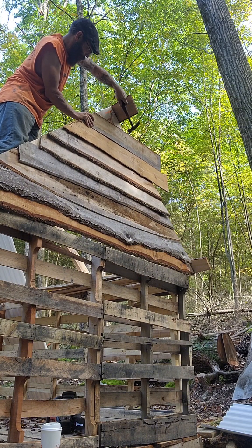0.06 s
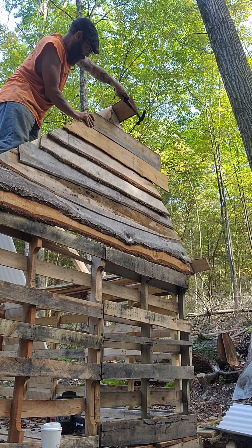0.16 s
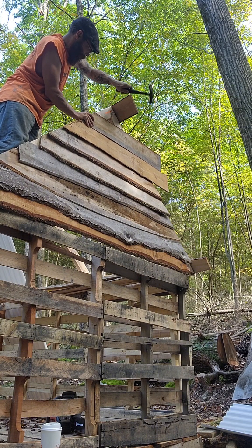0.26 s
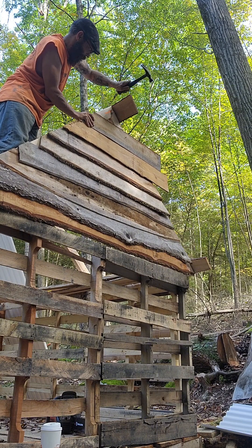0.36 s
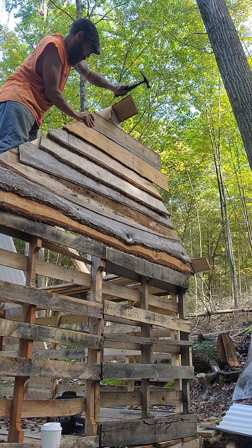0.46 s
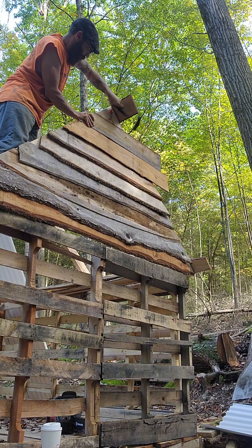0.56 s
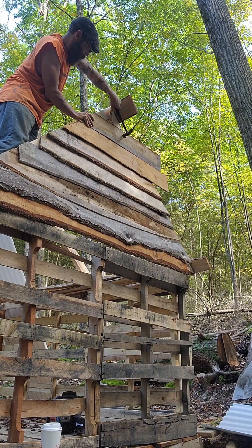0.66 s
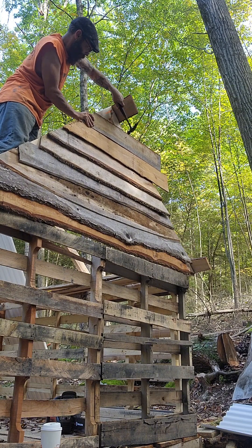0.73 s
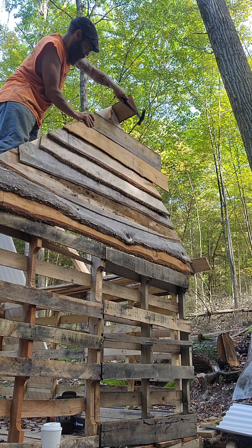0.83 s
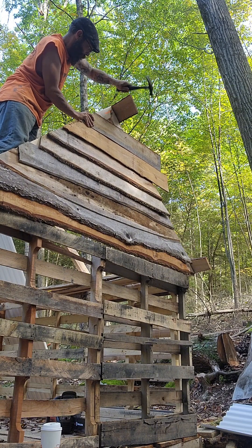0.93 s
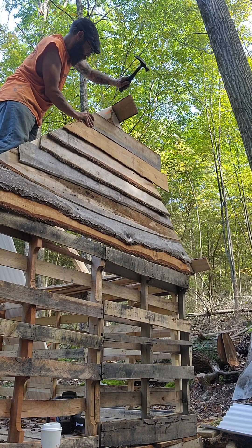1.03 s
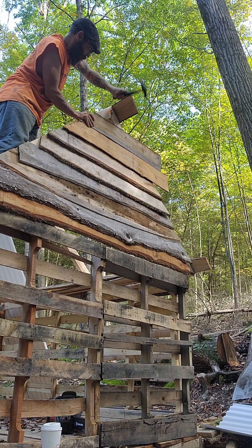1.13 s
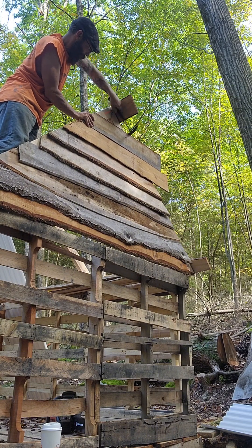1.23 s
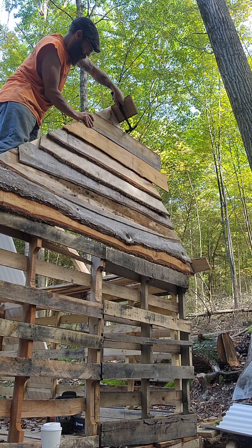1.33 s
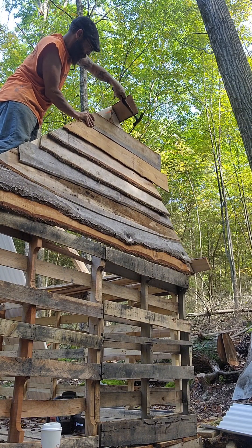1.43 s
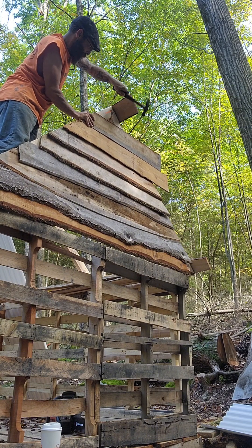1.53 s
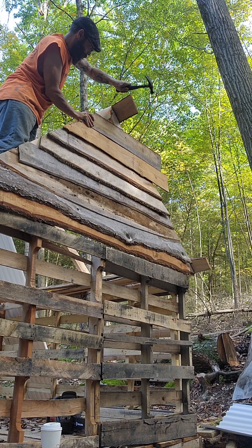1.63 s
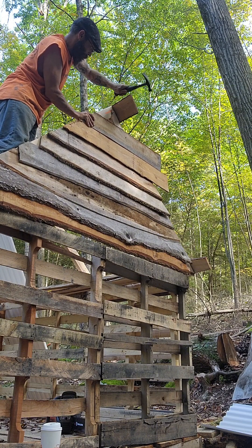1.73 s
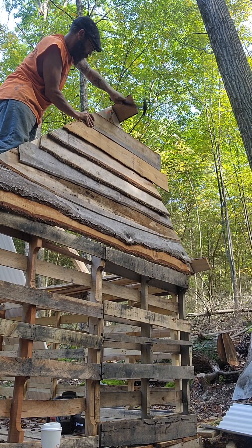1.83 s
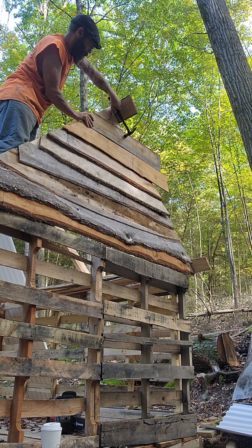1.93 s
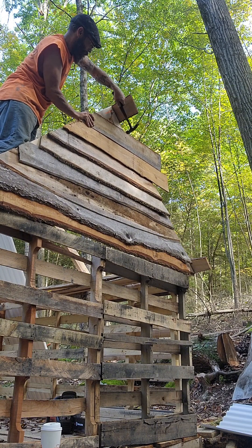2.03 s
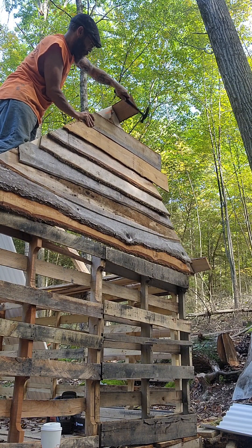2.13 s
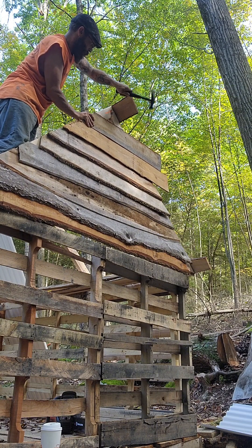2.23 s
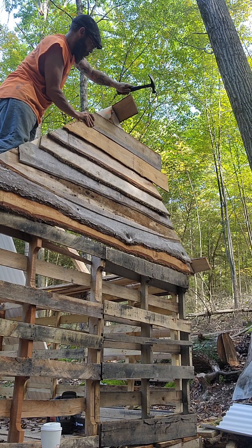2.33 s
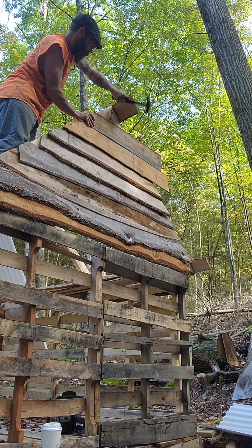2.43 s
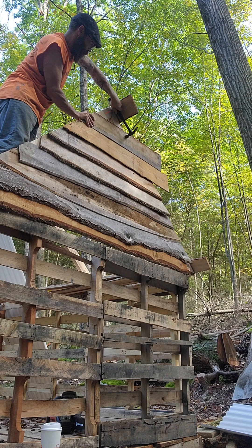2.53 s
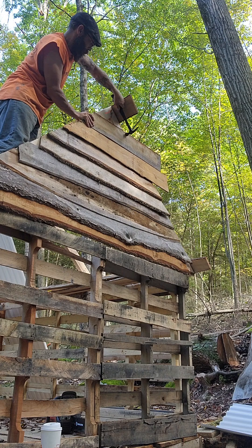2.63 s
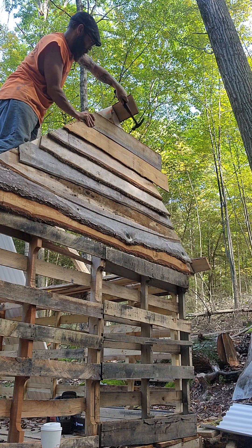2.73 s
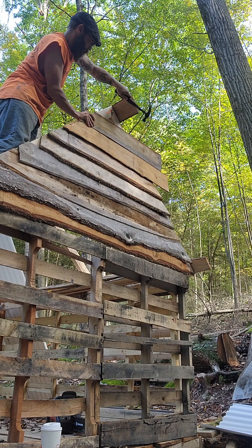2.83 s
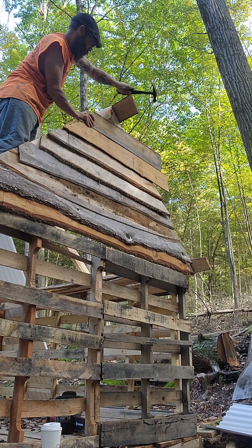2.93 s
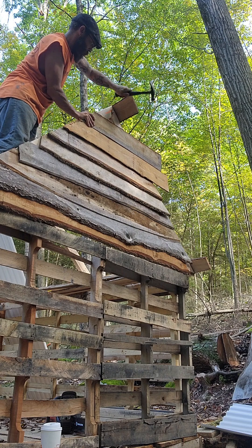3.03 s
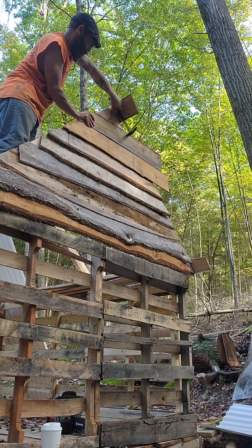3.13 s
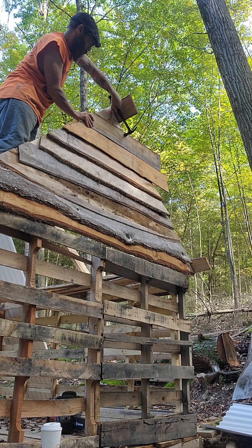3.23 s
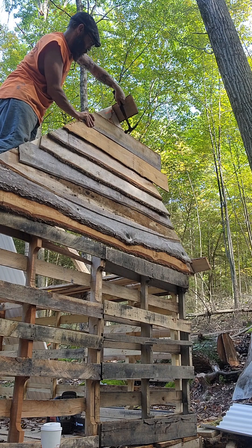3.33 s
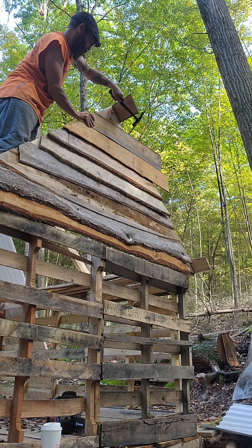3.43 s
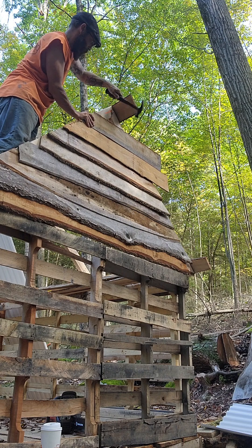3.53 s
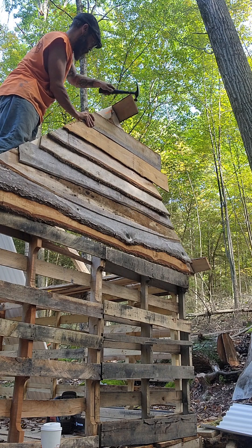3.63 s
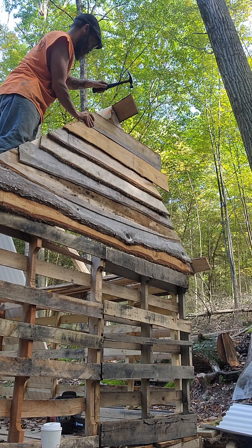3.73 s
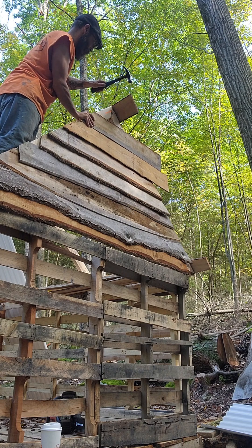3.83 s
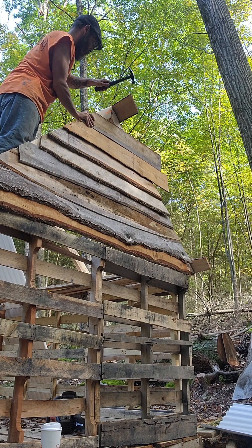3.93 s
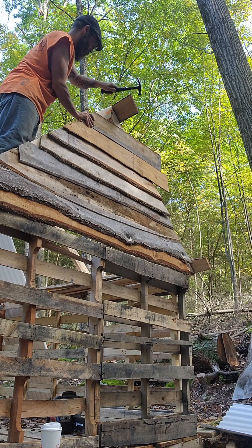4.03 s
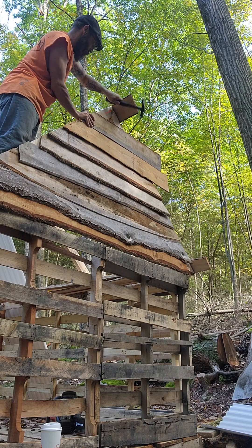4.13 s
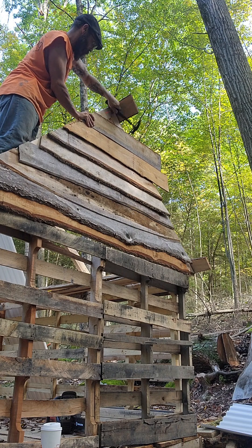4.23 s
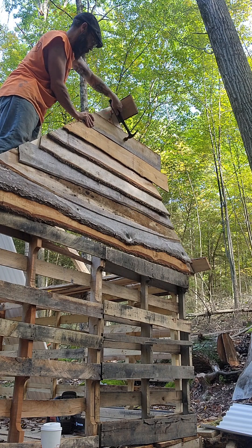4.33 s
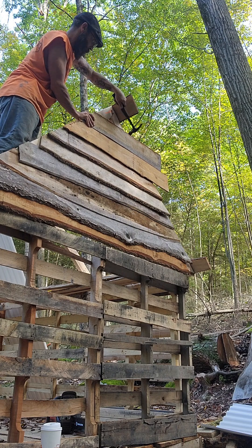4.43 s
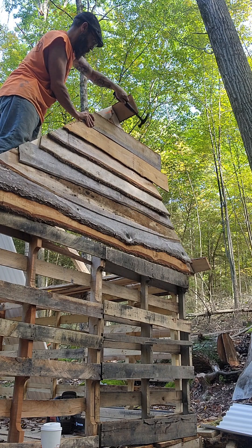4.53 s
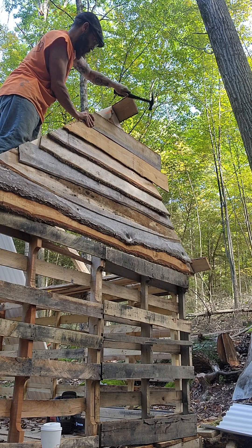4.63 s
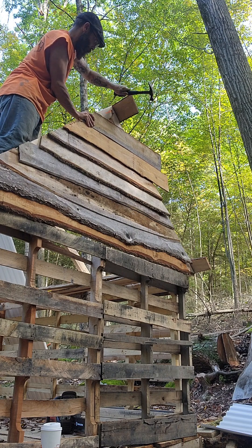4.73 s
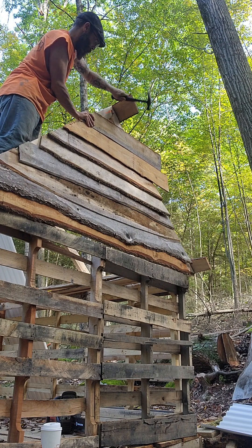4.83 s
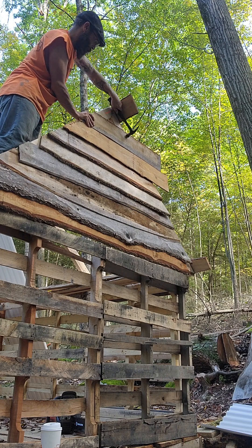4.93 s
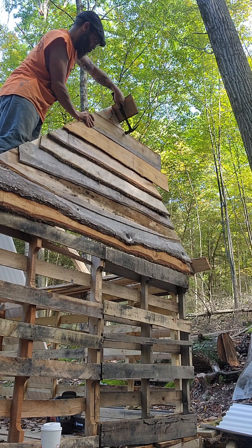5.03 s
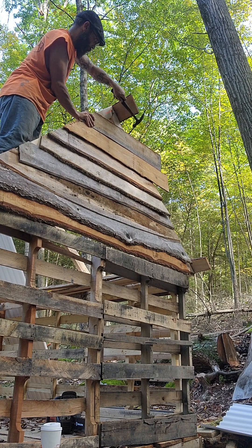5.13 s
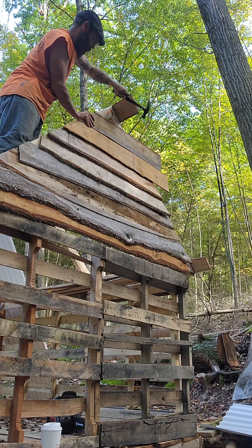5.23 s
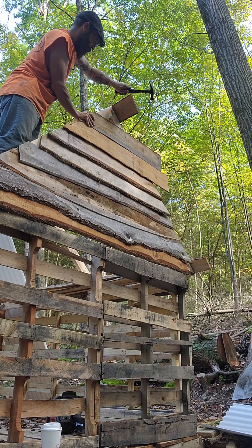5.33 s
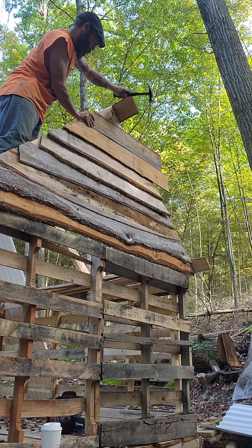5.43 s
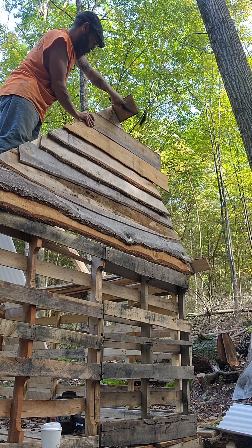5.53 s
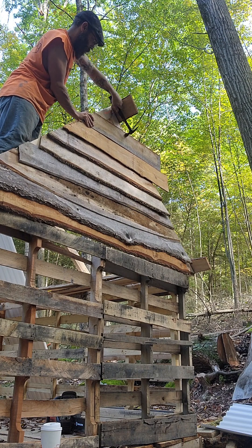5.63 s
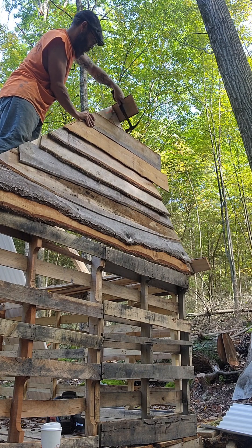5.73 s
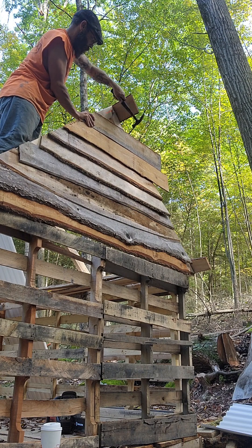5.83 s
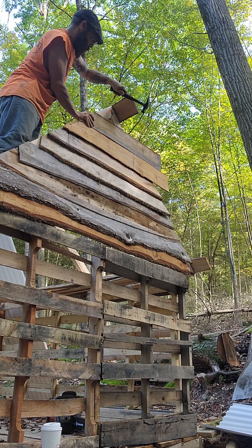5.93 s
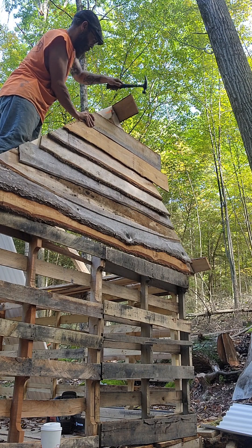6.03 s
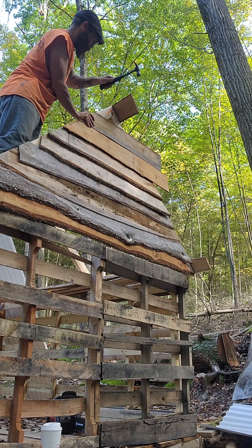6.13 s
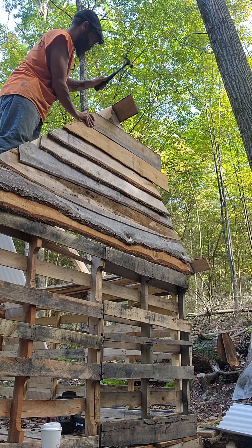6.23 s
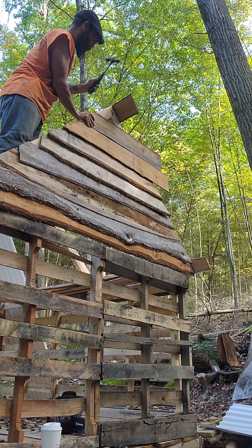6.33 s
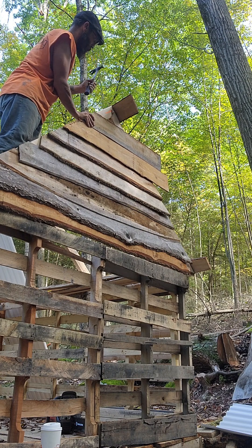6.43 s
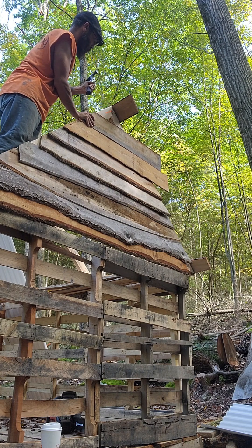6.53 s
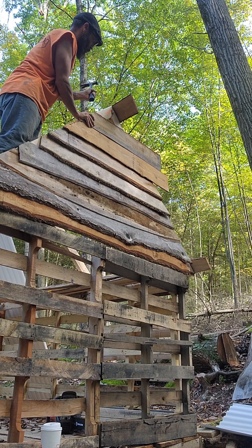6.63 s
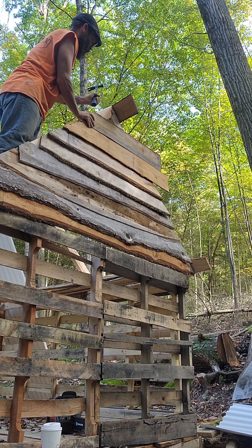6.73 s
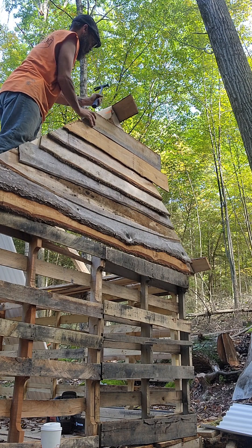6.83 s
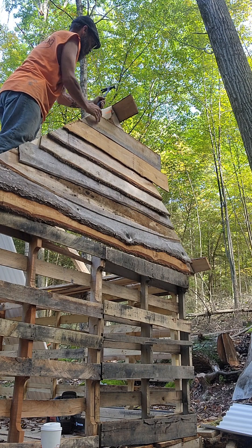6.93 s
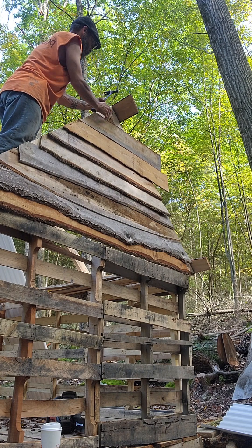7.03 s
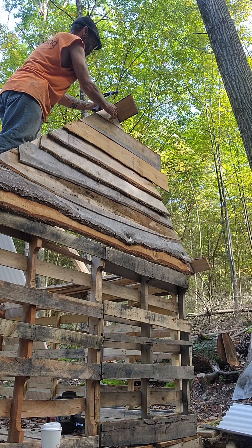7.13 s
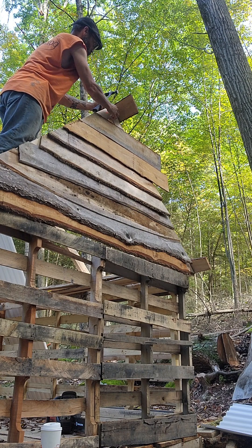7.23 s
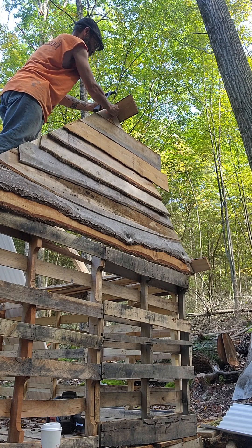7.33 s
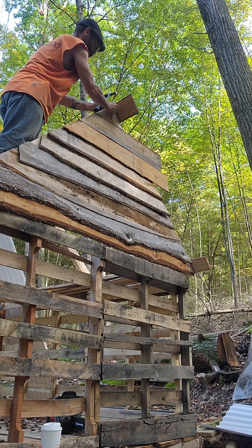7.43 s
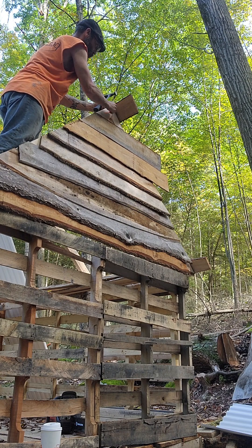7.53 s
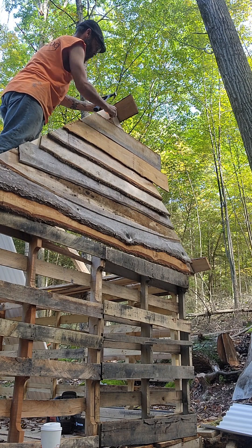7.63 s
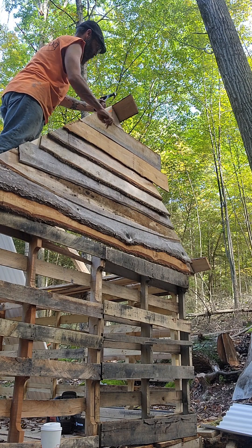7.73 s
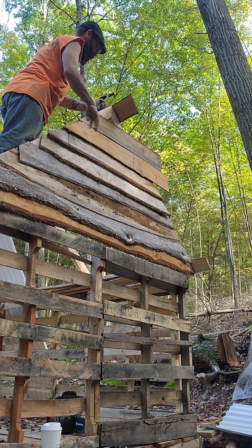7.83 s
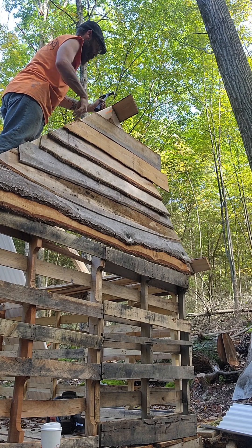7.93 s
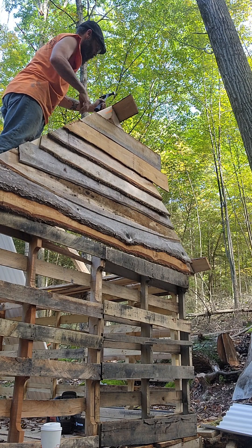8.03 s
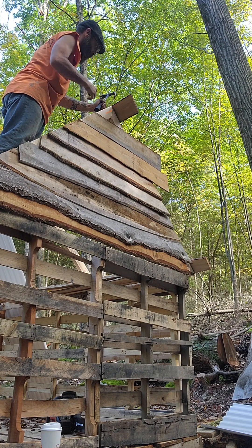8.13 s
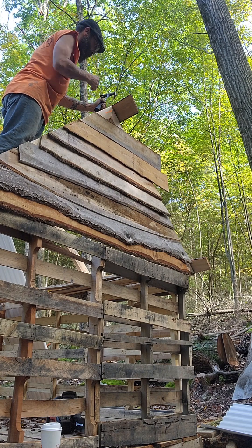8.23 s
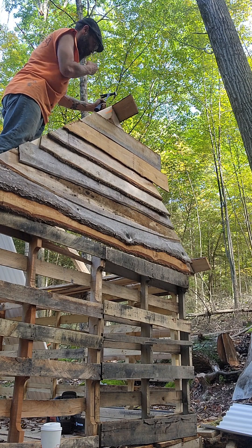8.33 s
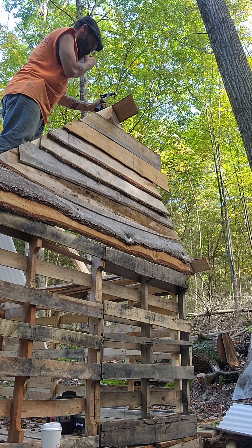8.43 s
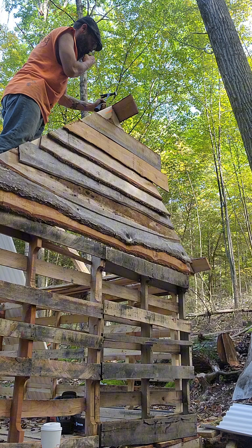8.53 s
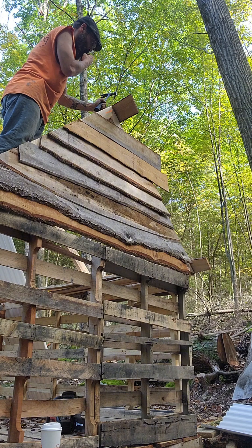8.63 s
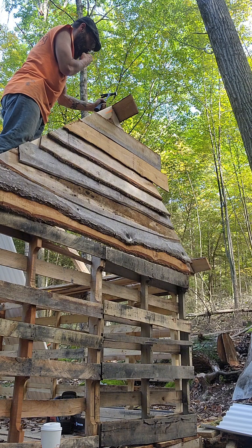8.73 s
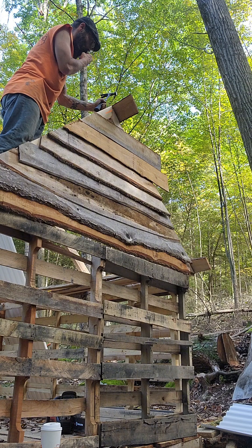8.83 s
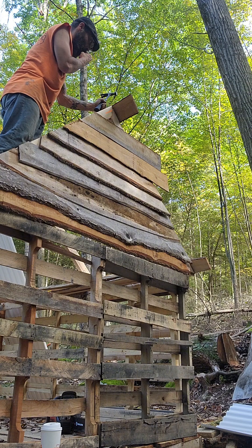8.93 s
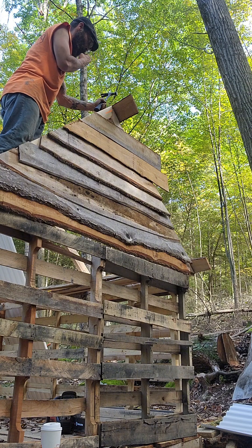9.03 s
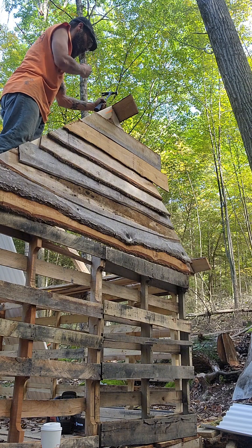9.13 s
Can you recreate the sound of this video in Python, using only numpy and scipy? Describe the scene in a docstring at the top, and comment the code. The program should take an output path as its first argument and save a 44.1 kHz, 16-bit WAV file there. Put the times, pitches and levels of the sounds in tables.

```python
"""A forest, a few metres from a pallet-wood cabin: a steel hammer drives nails into its top board.
Each blow sums damped contact, steel and board modes, a noise crack, decaying plank noise and one bass swing.
The trees answer with long, bright, clumpy noise echoes; air in the leaves and a faint far drone are shaped noise.
Afterwards nails clink softly as the next one is picked out and set on the board: noise clicks, taps and slides."""
import sys
import numpy as np
from scipy import signal
from scipy.fft import rfft, irfft, next_fast_len
from scipy.io import wavfile
from scipy.ndimage import uniform_filter1d, minimum_filter1d, map_coordinates

SR = 44100
rng = np.random.default_rng(int(sys.argv[2]) if len(sys.argv) > 2 else 0)


def generate_wav(signal):
    """Clip the signal to [-1, 1] and save it as 16-bit WAV at the path in sys.argv[1]."""
    frames = np.transpose(np.atleast_2d(signal))
    scaled = np.clip(frames, -1, 1) * 32767
    pcm = np.round(scaled).astype(np.int16)
    wavfile.write(sys.argv[1], SR, pcm)


N = 404382


def amp(db):
    """Decibels to gain."""
    return 10 ** (np.asarray(db) / 20)


def unit(x):
    """Scale to rms 1."""
    return x / np.sqrt(np.mean(x ** 2) + 1e-20)


def along(points, hz):
    """(Hz, value) points interpolated on a log frequency axis."""
    point_hz, values = np.transpose(points)
    return np.interp(np.log(hz + 1), np.log(point_hz + 1), values)


def curve(rows):
    """(s, value) rows as one value per sample."""
    return np.interp(np.arange(N) / SR, *np.transpose(rows))


def add(track, start_s, x):
    """Mix x into the track at start_s."""
    start = max(round(start_s * SR), 0)
    track[:, start:start + x.shape[-1]] += x[..., :N - start]


def filtered(x, response):
    """x through a complex frequency response, zero-padded."""
    n = x.shape[-1]
    padded = 2 * next_fast_len(n // 2 + 4096)  # even, as causal() requires
    spectrum = rfft(x, padded) * response(np.fft.rfftfreq(padded, 1 / SR))
    return irfft(spectrum, padded)[..., :n]


def causal(db):
    """Minimum-phase response with these gains: nothing sounds before the hit."""
    cepstrum = irfft(np.log(amp(db)))
    half = len(cepstrum) // 2
    fold = np.r_[1, np.full(half - 1, 2), 1, np.zeros(half - 1)]
    return np.exp(rfft(cepstrum * fold))


def noise(n, spectrum, alike):
    """Coloured stereo noise of rms 1; the mid/side mix sets the coherence at each frequency."""
    def mid_side_gains(hz):
        angle = np.arccos(np.clip(along(alike, hz), -1, 1)) / 2
        return amp(along(spectrum, hz)) * [np.cos(angle), np.sin(angle)]

    mid, side = filtered(rng.standard_normal((2, n)), mid_side_gains)
    return unit(np.array([mid + side, mid - side]))


def dying(x, t60s):
    """Each frequency of x decays at its own speed."""
    hz, t, z = signal.stft(x, SR, nperseg=256)
    decay = amp(-60 * t / along(t60s, hz)[:, None])
    return signal.istft(z * decay, SR, nperseg=256)[1][:, :x.shape[-1]]


def patchy(x, patch_db, streak_db):
    """Uneven gain: patches in time and frequency, and streaks of colour that last."""
    z = signal.stft(x, nperseg=1024)[2]
    patches = uniform_filter1d(rng.standard_normal(z.shape[1:]), size=7, axis=0)
    patches = uniform_filter1d(patches, size=5, axis=1)
    streaks = uniform_filter1d(rng.standard_normal((z.shape[1], 1)), size=3, axis=0)
    gain = amp(patch_db * unit(patches) + streak_db * unit(streaks))
    return signal.istft(z * gain, nperseg=1024)[1][:, :x.shape[-1]]


def near_surface(x, reflect=0.26, spacing_hz=665, rough_hz=3000):
    """A rough surface beside the microphone ripples the colour of far sounds; it scatters the treble."""
    def response(hz):
        back = reflect * np.exp(-(hz / rough_hz) ** 4)
        return 1 / (1 - back * np.exp(-2j * np.pi * hz / spacing_hz))

    return filtered(x, response)


# Air in the leaves, spectrum. Each row: frequency in Hz, relative density in dB per Hz.
AIR_SPECTRUM = [(20, -12.5), (53, -0.5), (110, -16), (160, -9), (220, -16.5), (400, -18), (750, -19),
                (1400, -21), (2300, -28), (5000, -30), (6900, -44.5), (8100, -59), (14000, -57.5),
                (16000, -60.5)]
# Air in the leaves, envelope. Each row: time in seconds, level in dB before balance and surface.
AIR_LEVEL = [(0, -58.5), (3, -61), (7.1, -64.5), (9.17, -60)]
# Far drone, spectrum. Each row: frequency in Hz, relative density in dB per Hz.
DRONE_SPECTRUM = [(90, -43.5), (145, 1.5), (170, 8.5), (200, -6.5), (300, -31), (900, -88)]
# Far drone, envelope. Each row: time in seconds, level in dB before balance and surface.
DRONE_LEVEL = [(0, -64), (1.1, -62), (1.95, -53), (2.35, -65), (3.8, -70), (4.2, -62), (4.9, -66),
               (6.3, -74.5), (8.7, -80.5), (9.15, -69.5)]
# Left-right likeness of far sounds. Each row: frequency in Hz, coherence 0-1.
FAR_COHERENCE = [(100, 1), (500, 0.48), (1200, 0.14), (3000, 0.05)]


def background():
    """Light air in the leaves and a low drone that comes and goes: noise under slow envelopes."""
    air = amp(curve(AIR_LEVEL)) * noise(N, AIR_SPECTRUM, FAR_COHERENCE)
    drone = amp(curve(DRONE_LEVEL)) * noise(N, DRONE_SPECTRUM, FAR_COHERENCE)
    balance_db = [[.65], [-.65]]
    return (air + drone) * amp(balance_db)


def ring(modes, t, scatter_db, rise_cycles, phase=0):
    """Damped modes that build up over about rise_cycles of their own, at new random strengths each time."""
    hz, db, t60_s = np.transpose(modes)[:, :, None]
    level_db = db + scatter_db * rng.standard_normal(db.shape)
    rise = 1 - np.exp(-t * hz / rise_cycles)
    decay = 1000. ** (-t / t60_s)
    return np.sum(amp(level_db) * rise * decay * np.sin(2 * np.pi * hz * t + phase), axis=-2)


def shove(t, push_db=1.5, push_hz=222, delay_s=.0023, life_s=.0042, leak_hz=190):
    """The nail bites and the board gives way: one heavily damped swing."""
    u = np.maximum(t - delay_s, 0)
    swing = amp(push_db) * np.sin(2 * np.pi * push_hz * u) * np.exp(-u / life_s)
    # the deepest bass slips round the edges of the open board
    return filtered(swing, lambda hz: (1j * hz / (leak_hz + 1j * hz)) ** 2)


def off_ground(x, bounce_db=-15, bounce_delay_s=.0205):
    """The sound plus one reflection from the forest floor."""
    return filtered(x, lambda hz: 1 + amp(bounce_db) * np.exp(-2j * np.pi * hz * bounce_delay_s))


def blow_tone(weight_db, hardness_db, muffling):
    """Weight sets the thud, hardness trades knock for crack and fizz; muffling knocks more, fizzes less."""
    # fixed terms: a clean blow on the nail
    knock_db = -0.5 - 0.45 * hardness_db + 3 * muffling
    fizz_db = 4 + 0.4 * hardness_db - 14.5 * muffling
    return [(214, weight_db), (600, knock_db), (3900, hardness_db), (9500, fizz_db)]  # (Hz, dB)


def coloured(x, weight_db, hardness_db, muffling, lift_hz, lift_db, width=.11):
    """How squarely and where the head lands sets the tone and favours one board resonance."""
    tone = blow_tone(weight_db, hardness_db, muffling)

    def response(hz):
        lift = lift_db / (1 + ((hz / lift_hz - 1) / width) ** 2)
        return causal(along(tone, hz) + lift)

    return filtered(x, response)


# Port shading. Each row: frequency in Hz, left over right in dB.
LEFT_OVER_RIGHT = [(100, 0.1), (700, 0.76), (1400, -3), (2500, 4), (3100, 7.5), (4200, -6), (6500, 6),
                   (8200, 9.5), (15000, 3.5)]


def from_left(x, lead_ms=0.15):
    """Work off to one side: the left port hears it first, the housing shades each port differently."""
    side = np.array([[.5], [-.5]])

    def response(hz):
        shift = np.exp(2j * np.pi * hz * side * lead_ms / 1000)
        return amp(side * along(LEFT_OVER_RIGHT, hz)) * shift

    return filtered(x, response)


# Hammer blows. Each row: start in seconds, weight in dB, hardness in dB, muffling 0-1 (how far the head
# lands on the wood and stays there), favoured resonance in Hz, its lift in dB, steel ring in dB, echo in dB;
# dB values are offsets.
HAMMER_BLOWS = [(0.0731, 0, 3, .05, 232, 0, -12.5, -2), (0.7413, -0.5, -1.5, 0.09, 850, 2, 2, -2),
                (1.3900, 0, 1.5, 0.12, 720, 1, -1.5, 0.5), (2.0323, -0.5, 1.5, 0, 1300, 2.5, -6.5, -0.5),
                (2.6767, -1.5, 2, 0.09, 1435, 0, -9.5, 0), (3.3139, -4, -1.5, 0.12, 1895, 8, -15.5, 5),
                (4.4155, -0.5, -3.5, 0.97, 358, 3, -24.5, -5),
                (5.0756, -4.5, 4, 0.5, 522.7, 11.5, -16, 0.5), (5.7175, -5, 1.6, 0.23, 519, 1, -6.5, 0.5)]
# Head, nail and wood in contact. Each row: frequency in Hz, relative level in dB, t60 in seconds.
CONTACT_MODES = [(1420, -10.5, .022), (1870, -17.5, 0.026), (2720, -8.5, 0.0073), (2900, -14, .012),
                 (3870, -11.5, 0.014), (4080, -7, 0.01), (5162, -20, 0.01)]
# Crack of steel on steel and splitting fibres. Each row: frequency in Hz, relative density in dB per Hz.
SNAP_SPECTRUM = [(500, -4), (4500, 2), (6800, -12.5), (8000, -24.5), (11000, -18), (13500, -19),
                 (16000, -31)]
# Free ring of the steel. Each row: frequency in Hz, relative level in dB, t60 in seconds.
STEEL_MODES = [(4040, -8, .12), (5088, 0, .17), (6885, -10, .1)]
# Board on its frame. Each row: frequency in Hz, relative level in dB, t60 in seconds before blow damping.
BOARD_MODES = [(87, -37, .6), (158, -27, .2), (211, -21.5, .23), (246, -25, .22), (288, -28, .22),
               (358, -27, .2), (425, -30, .2), (512, -26, .19), (592, -26, .2), (688, -26, .16),
               (755, -31, .16), (850, -30, .16), (1050, -32, .18), (1210, -31, .17), (1332, -29, .15),
               (1460, -30, .13)]
# Many close modes of the stacked planks. Each row: frequency in Hz, relative density in dB per Hz.
PLANK_SPECTRUM = [(30, -42), (70, -23), (110, -22), (160, -5.5), (230, 1), (680, -0.5), (1000, -3.5),
                  (1450, -4), (2400, -12), (5000, -15.5), (6500, -24), (7900, -38), (13500, -34.5),
                  (16000, -41)]
# Plank decay. Each row: frequency in Hz, t60 in seconds before blow damping.
PLANK_DECAY = [(80, 0.72), (200, 0.29), (600, 0.21), (1400, 0.19), (4500, .17), (11000, 0.15)]
# Left-right likeness of near sounds. Each row: frequency in Hz, coherence 0-1.
NEAR_COHERENCE = [(150, 0.93), (700, 0.92), (2000, 0.52), (5000, 0.16), (12000, 0.08)]


def hammering(planks_db=-15.0, steel_db=-26, snap_db=-15, snap_life_s=0.0021, spread_s=0.0038,
              fresh=.6, port_turn_rad=0.28):
    """Every blow wakes the same board and planks; the loose ones rattle a little differently each time."""
    track, t = np.zeros((2, N)), np.arange(SR // 2) / SR
    spread = 1 - np.exp(-t / spread_s)  # bending waves need time to fill the frame
    board_phase = rng.uniform(0, 2 * np.pi, (len(BOARD_MODES), 1))
    frame = noise(len(t), PLANK_SPECTRUM, NEAR_COHERENCE)
    for start_s, weight_db, hardness_db, muffling, lift_hz, lift_db, ring_db, _ in HAMMER_BLOWS:
        # fresh: power share of the rattle that is new in this blow
        new_rattle = noise(len(t), PLANK_SPECTRUM, NEAR_COHERENCE)
        rattle = np.sqrt(1 - fresh) * frame + np.sqrt(fresh) * new_rattle
        rattle = dying(patchy(rattle, patch_db=2.0, streak_db=1.5), PLANK_DECAY)
        planks = amp(planks_db) * spread * rattle
        board = ring(BOARD_MODES, t, scatter_db=3.0, rise_cycles=1.0, phase=board_phase)
        # a board pressed by the head stops sooner
        damping_db_per_s = -6 + 110 * muffling
        wood = amp(-damping_db_per_s * t) * (board + planks)

        snap = amp(snap_db) * np.exp(-t / snap_life_s) * noise(len(t), SNAP_SPECTRUM, NEAR_COHERENCE)
        # near reflections turn each mode a little differently at the two ports
        turn = port_turn_rad * rng.standard_normal((2, len(CONTACT_MODES), 1))
        contact = ring(CONTACT_MODES, t, scatter_db=2.5, rise_cycles=0.93, phase=turn)
        steel = amp(steel_db + ring_db) * ring(STEEL_MODES, t, scatter_db=0.5, rise_cycles=1.0)

        blow = off_ground(contact + snap + shove(t)) + wood
        blow = coloured(blow, weight_db, hardness_db, muffling, lift_hz, lift_db)
        add(track, start_s, blow + steel)
    return from_left(track)


# Echo from the trunks. Each row: frequency in Hz, relative density in dB per Hz.
FOREST_SPECTRUM = [(50, -2), (170, 1), (330, 4.5), (620, -2), (1350, -1.5), (2050, -2.5), (2500, -5.5),
                   (5000, -1.5), (6000, -11.5), (7000, -15), (7900, -31), (15000, -28)]
# Echo decay. Each row: frequency in Hz, t60 in seconds.
FOREST_DECAY = [(150, 2), (600, 1.655), (1800, 1.595), (4500, 1), (7000, 0.77), (11000, 0.42)]


def forest_echo(echo_db=-42.0, build_s=0.15, clump_db=0.9, clumps_per_s=45):
    """Trunks near and far scatter each blow back in its colour; the echo swells, then fades in clumps."""
    track, t = np.zeros((2, N)), np.arange(SR * 3 // 2) / SR
    swell = 1 - np.exp(-(t / build_s) ** 2)
    for start_s, *tone, _, blow_echo_db in HAMMER_BLOWS:
        clumps = map_coordinates(rng.standard_normal(256), [t * clumps_per_s], mode="wrap")
        tail = patchy(noise(len(t), FOREST_SPECTRUM, FAR_COHERENCE), patch_db=1.5, streak_db=2.5)
        tail = coloured(dying(tail, FOREST_DECAY), *tone)
        add(track, start_s, amp(echo_db + blow_echo_db + clump_db * clumps) * swell * tail)
    return track


def fumble(start_s, length_s, attack_s=.015, release_s=.04, sag_db_per_s=18):
    """Envelope of one slide of the fingers: a quick rise, a slow sag, a release."""
    t = np.maximum(np.arange(N) / SR - start_s, 0)
    release = np.exp(-np.maximum(t - length_s, 0) / release_s)
    return (1 - np.exp(-t / attack_s)) * amp(-sag_db_per_s * t) * release


# Clearest clinks. Each row: start in seconds, level in dB before trim, wood tap in dB against the click.
NAIL_CLINKS = [(7.422, -49, -18), (7.4549, -50.5, -9), (7.521, -46.5, -20), (7.526, -48, -20),
               (7.640, -45.5, -2.5), (7.646, -46, -8), (7.894, -53, -15), (8.998, -51.5, -17)]
# Nail clicks and slides. Each row: frequency in Hz, relative density in dB per Hz.
NAIL_SPECTRUM = [(2500, -7), (4500, 9.5), (7000, -1), (8800, -16), (10500, -7), (13500, -16), (16000, -5)]
# Fingers sliding among the nails. Each row: start in seconds, length in seconds, level in dB before grain.
NAIL_SLIDES = [(7.396, .24, -70.5), (7.817, .08, -77)]


def nails(trim_db=-7, life_s=0.0019, after_db=-20, after_life_s=0.03, tap_life_s=0.013, grain_db=4,
          ticks_per_s=25, tick_db=14, tick_scatter_db=5):
    """Nails, damped by the fingers, click and slide on each other; each clink also taps the board."""
    t = np.arange(SR // 5) / SR

    def click():
        decay = np.exp(-t / life_s) + amp(after_db) * np.exp(-t / after_life_s)
        return decay * noise(len(t), NAIL_SPECTRUM, NEAR_COHERENCE)

    grains = unit(amp(grain_db * unit(uniform_filter1d(rng.standard_normal(N), size=160))))
    slides = sum(amp(db) * fumble(start_s, length_s) for start_s, length_s, db in NAIL_SLIDES)
    track = slides * grains * noise(N, NAIL_SPECTRUM, NEAR_COHERENCE)

    for start_s, db, tap_db in NAIL_CLINKS:
        tap = amp(tap_db) * np.exp(-t / tap_life_s) * noise(len(t), PLANK_SPECTRUM, NEAR_COHERENCE)
        add(track, start_s, amp(db + trim_db) * (click() + tap))

    # small chance clicks during the slides
    tick = click()
    for start_s, length_s, db in NAIL_SLIDES:
        gaps_s = rng.uniform(0, 2, size=24) / ticks_per_s
        sizes = rng.standard_normal(size=24)
        for delay_s, size in zip(np.cumsum(gaps_s), sizes):
            if delay_s < length_s:
                level_db = db + trim_db + tick_db + tick_scatter_db * size
                add(track, start_s + delay_s, amp(level_db) * tick)
    return from_left(track)


def scene():
    """The work on the top board and the forest around it."""
    far = near_surface(forest_echo() + background())
    return hammering() + nails() + far


def record(dry, ceiling=.96, top_hz=15750):
    """A fast look-ahead limiter holds peaks under full scale; then a steep band limit."""
    needed = np.minimum(1, ceiling / (np.abs(dry).max(axis=0) + 1e-9))
    gain = uniform_filter1d(minimum_filter1d(needed, size=33), size=33)
    return filtered(dry * gain, lambda hz: 1 / np.sqrt(1 + (hz / top_hz) ** 120))


dry = scene()
out = record(dry)
generate_wav(out)
```